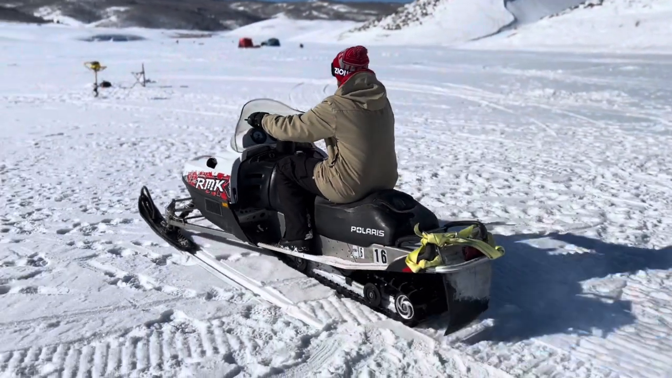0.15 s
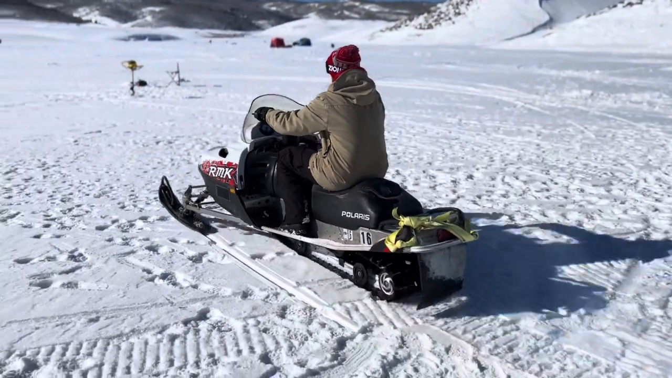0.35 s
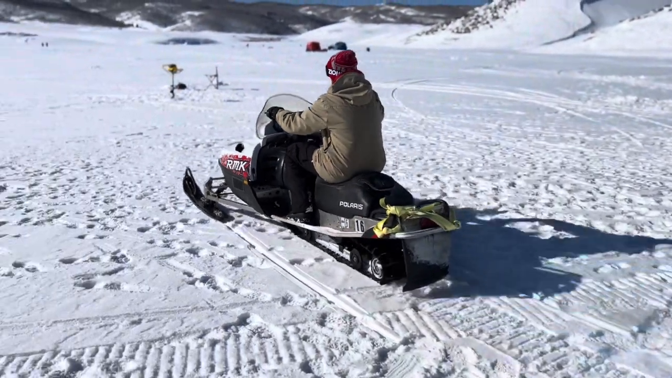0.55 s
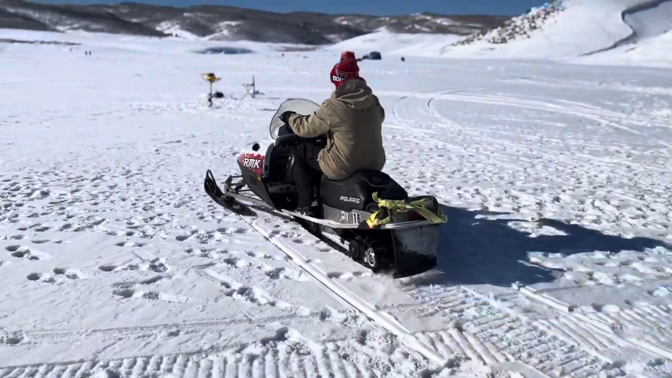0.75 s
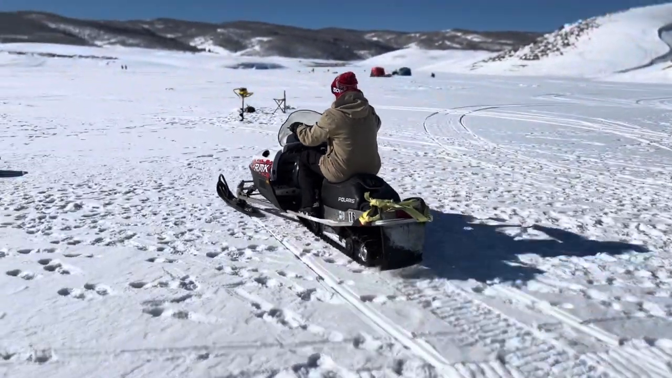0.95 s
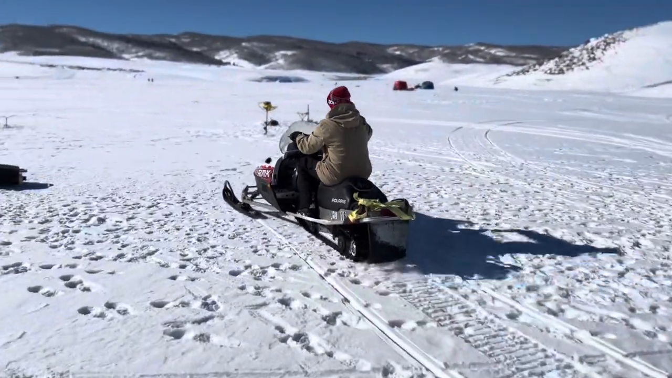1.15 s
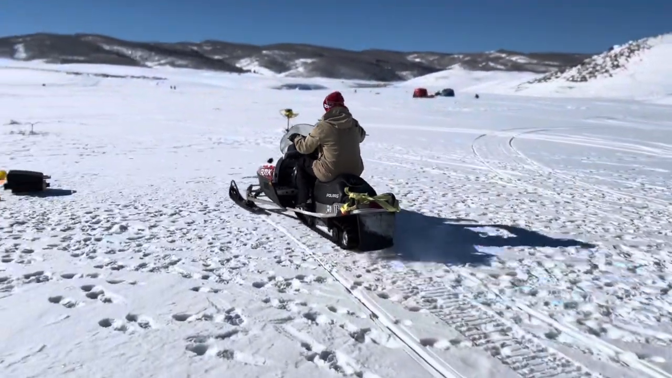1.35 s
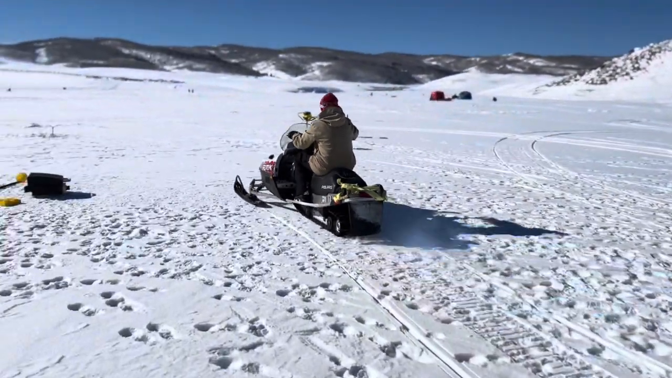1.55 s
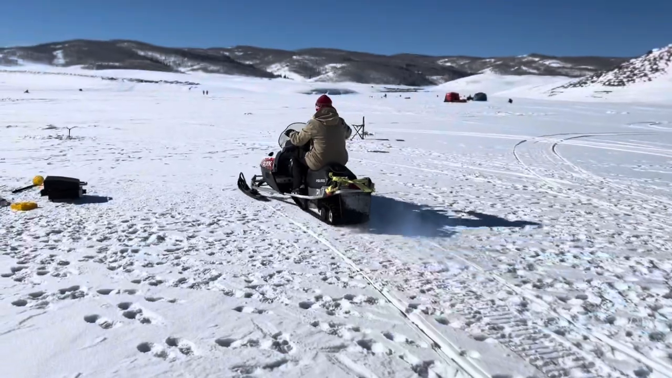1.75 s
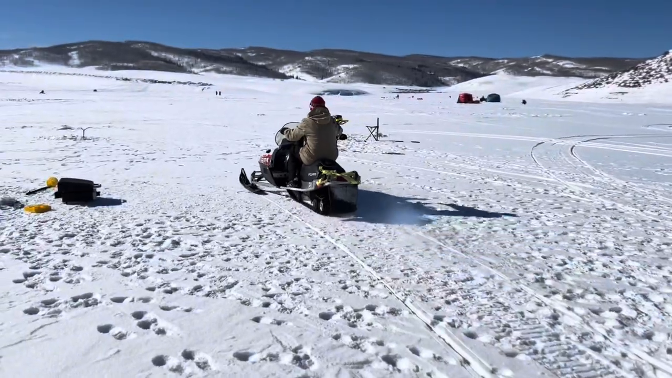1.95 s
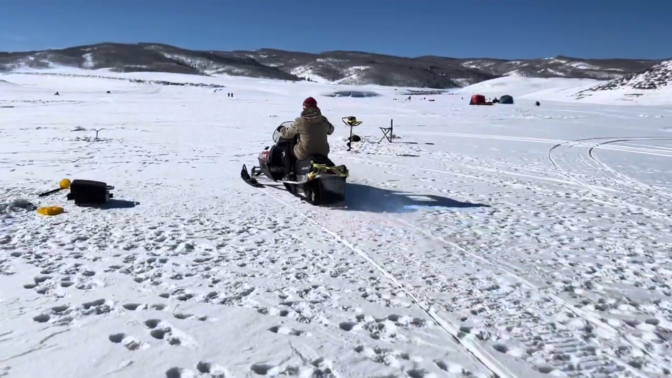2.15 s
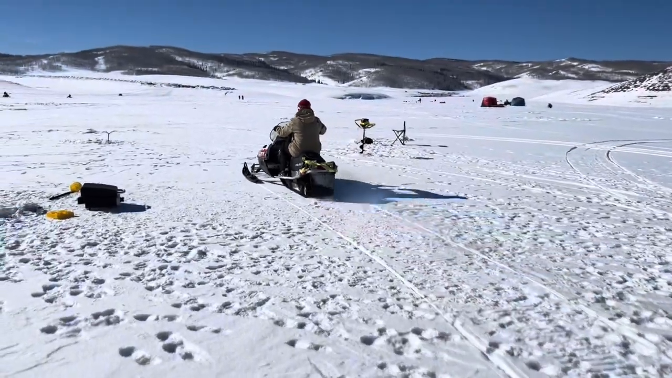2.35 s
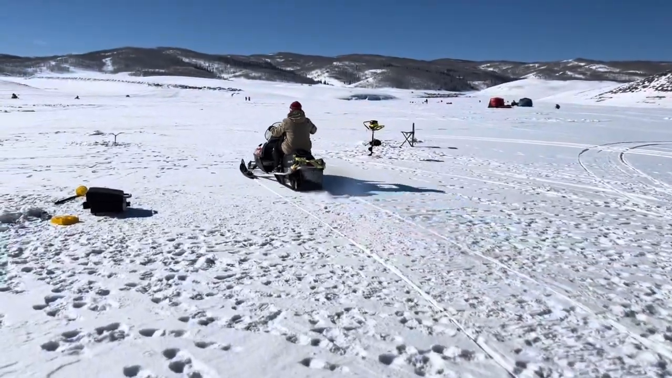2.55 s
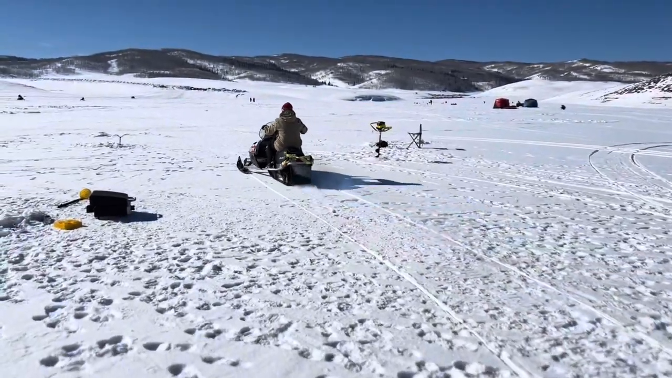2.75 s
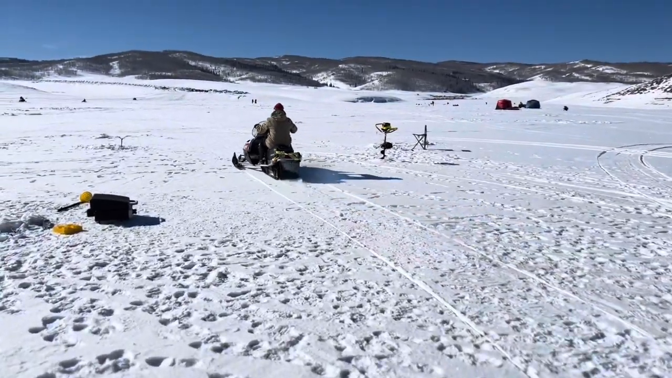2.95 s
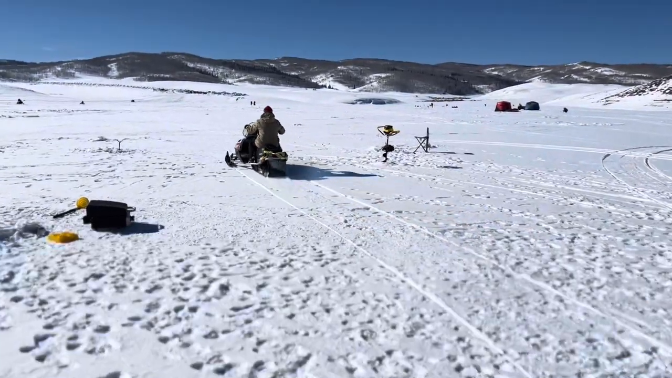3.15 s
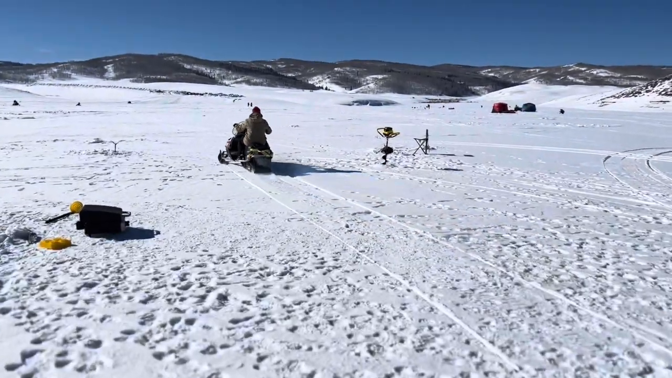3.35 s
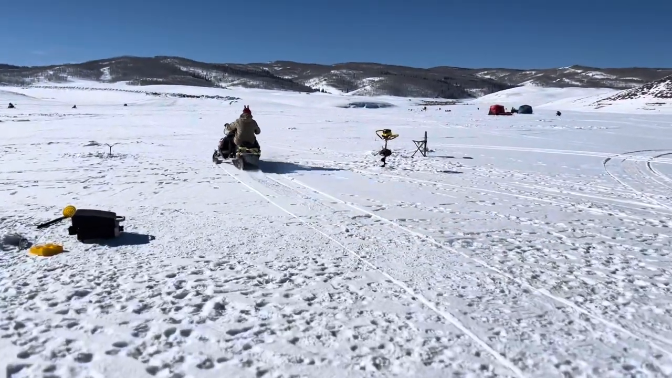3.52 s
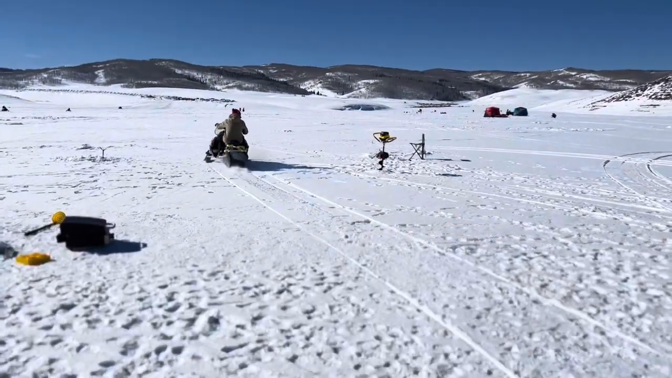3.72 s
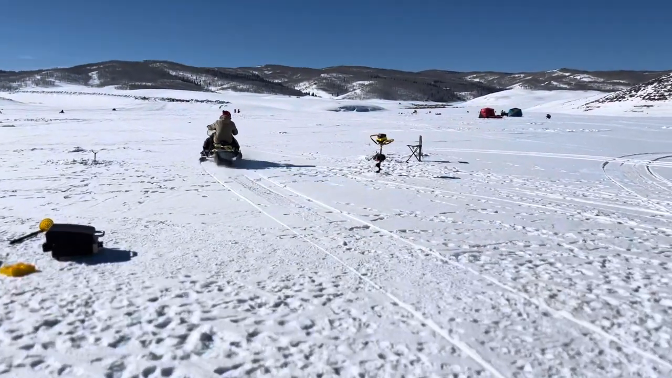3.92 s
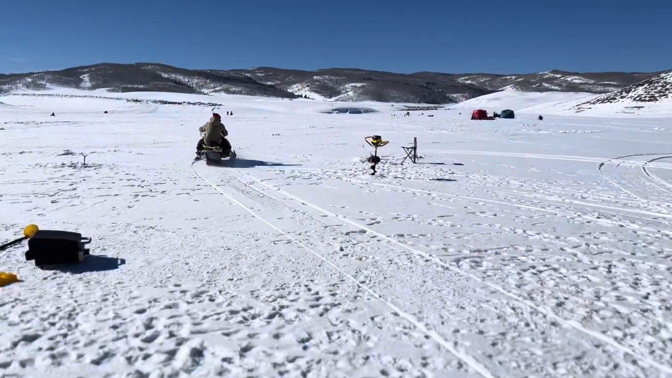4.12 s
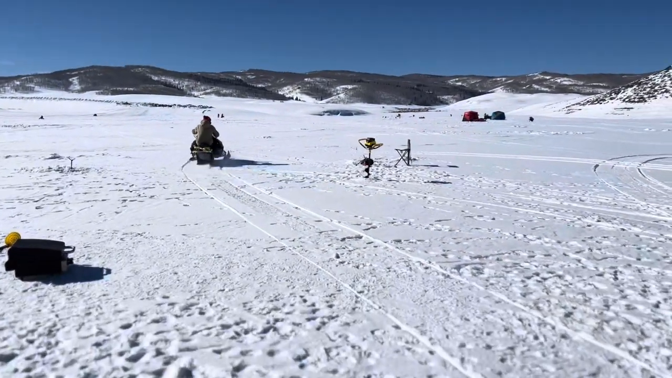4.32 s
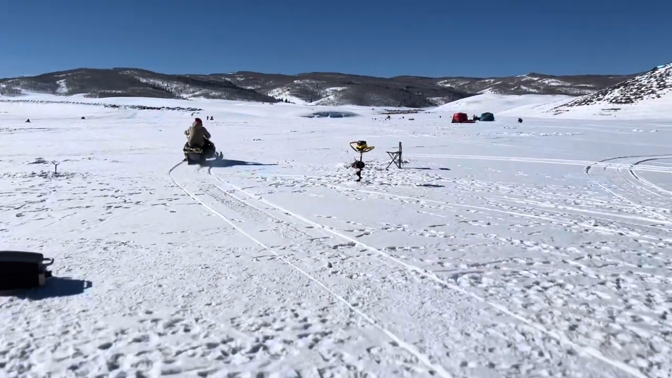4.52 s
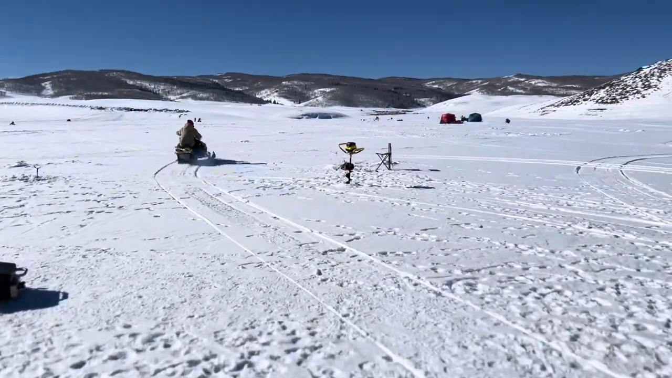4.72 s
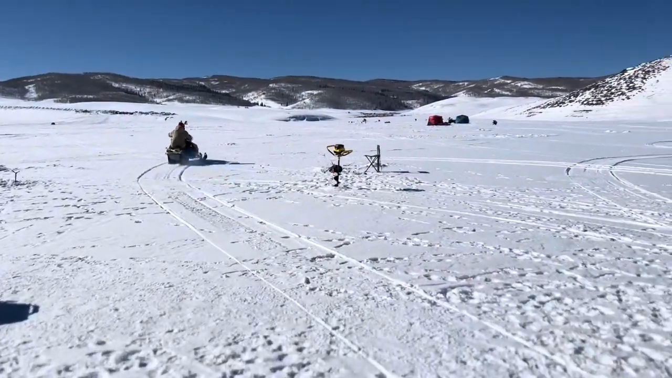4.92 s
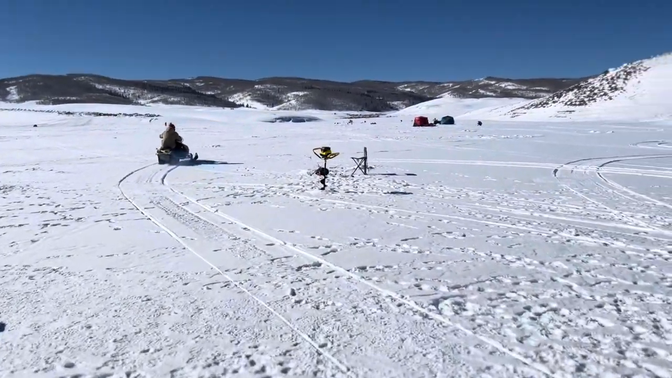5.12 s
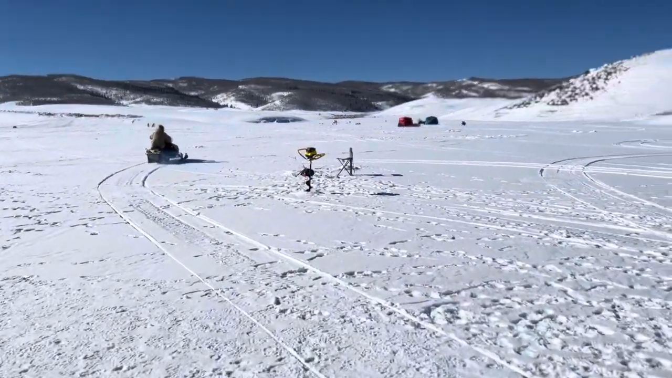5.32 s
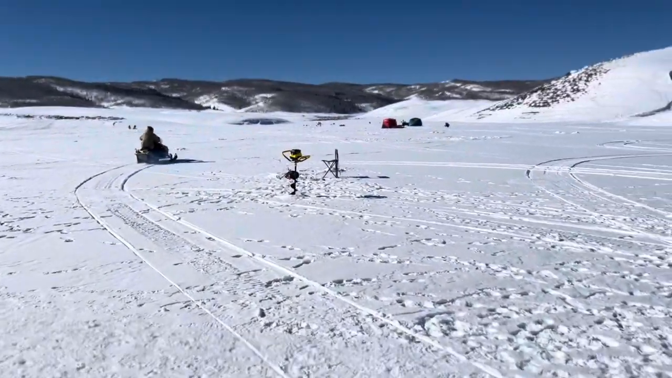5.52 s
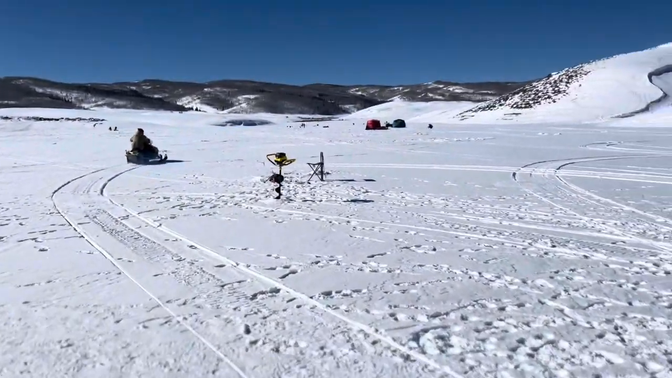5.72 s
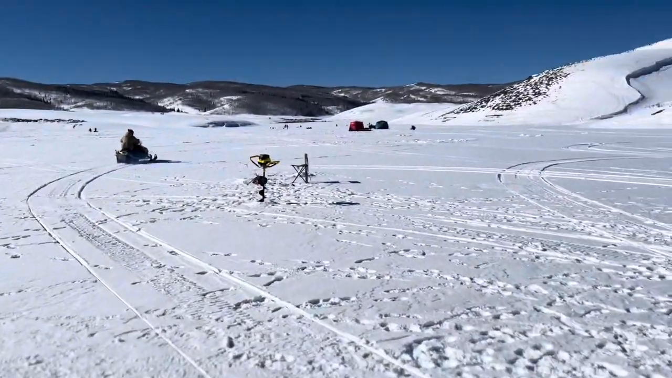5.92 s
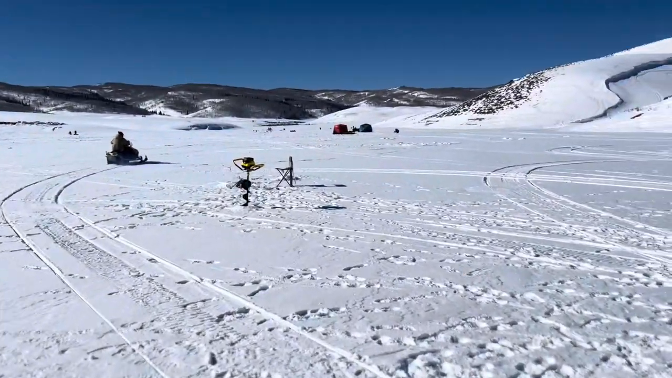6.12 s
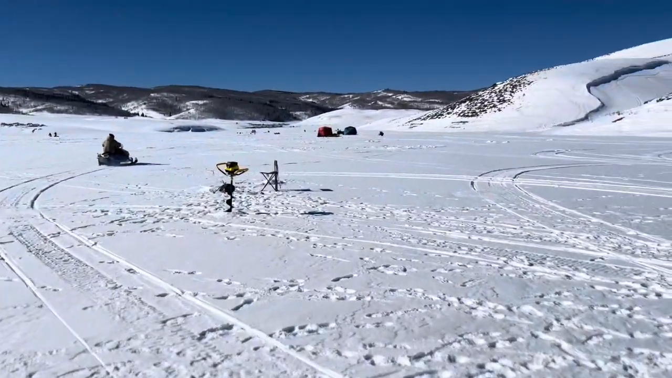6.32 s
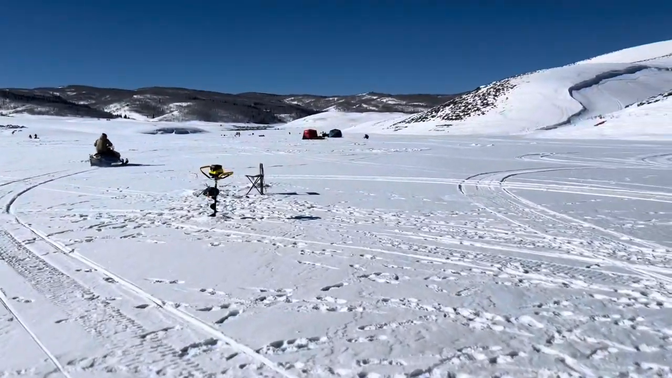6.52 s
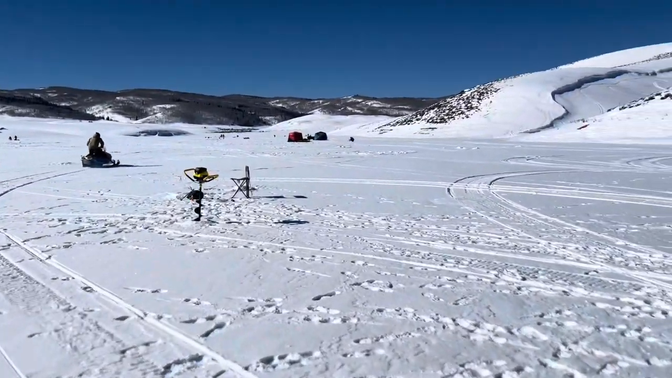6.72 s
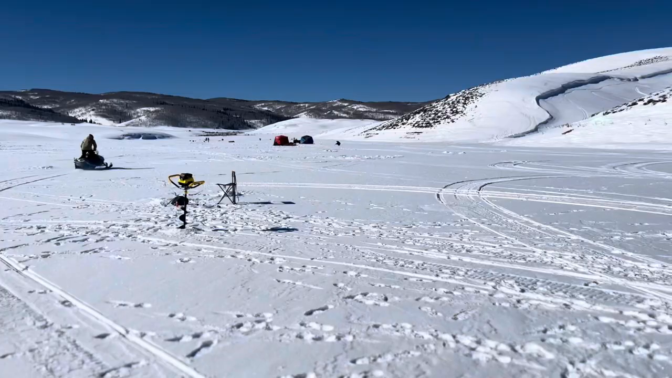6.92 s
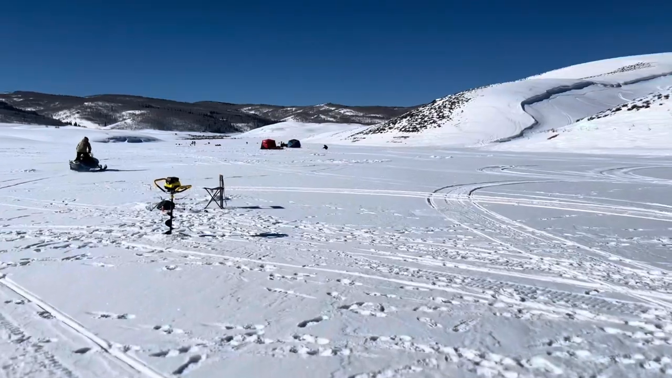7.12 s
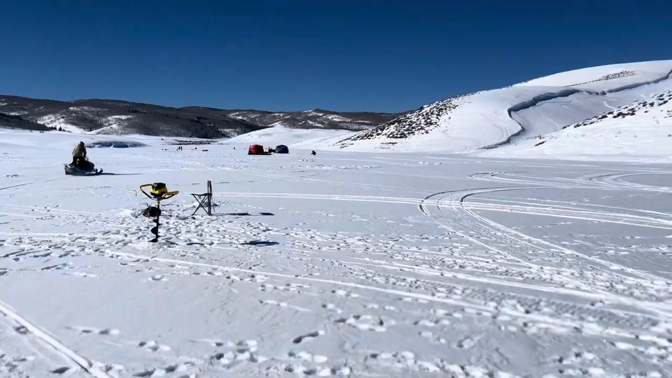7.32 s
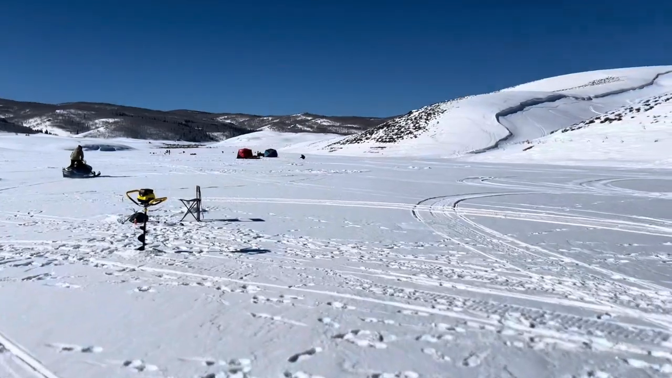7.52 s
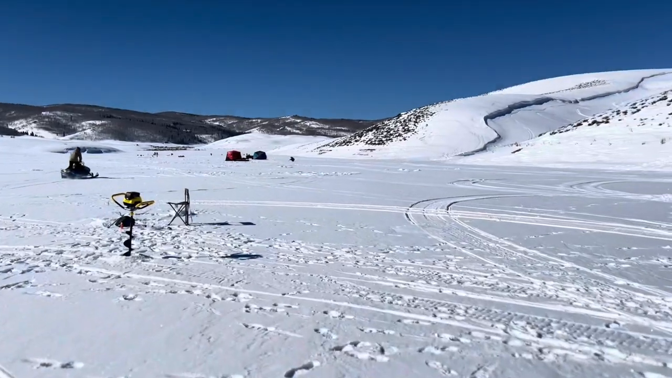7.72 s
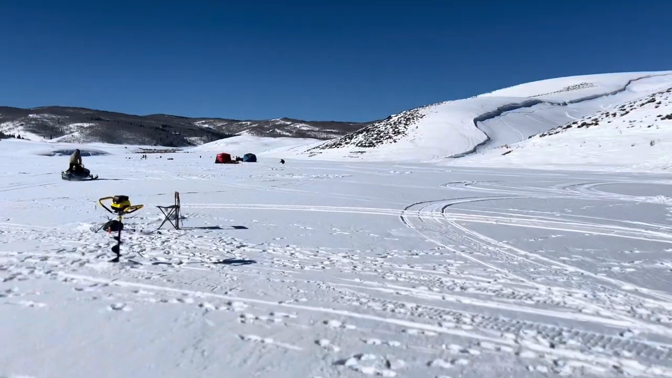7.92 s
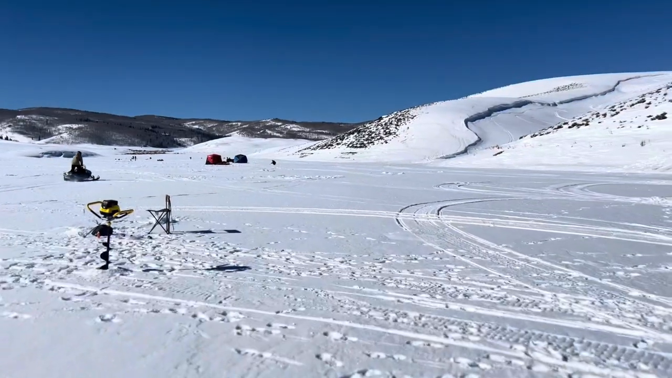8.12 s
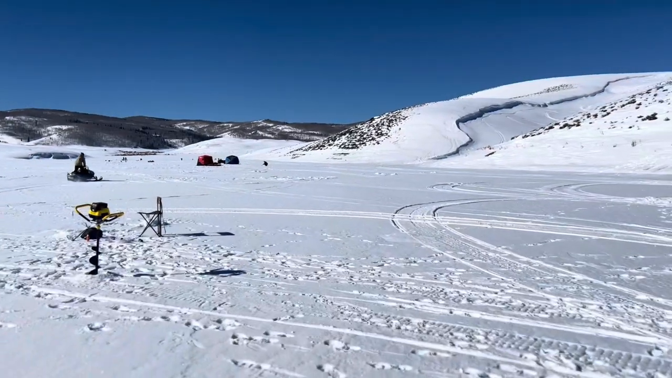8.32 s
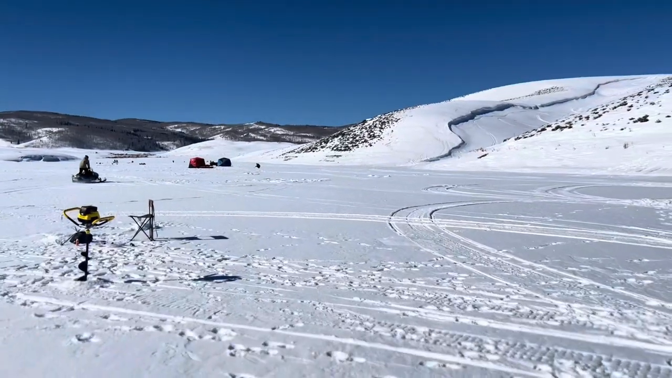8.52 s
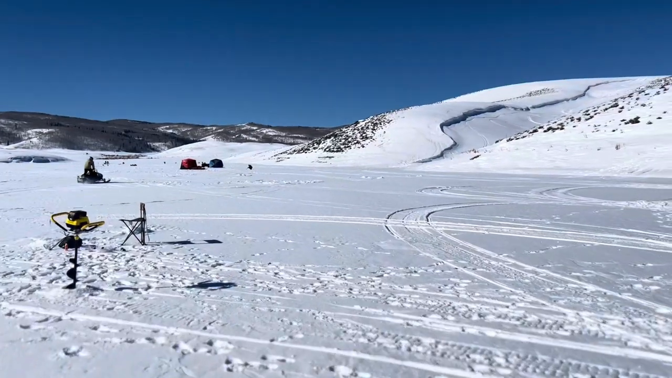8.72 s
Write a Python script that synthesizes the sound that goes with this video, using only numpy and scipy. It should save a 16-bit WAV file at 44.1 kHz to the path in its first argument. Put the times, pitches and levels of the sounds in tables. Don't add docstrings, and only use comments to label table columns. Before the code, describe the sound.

At 0 seconds a two-stroke snowmobile is already running loudly a few metres away, a low throbbing drone near 65 hertz with uneven thumping firings, raspy metallic buzz and bright snow hiss from track and skis. Over the first two seconds it pulls away, with irregular heavier pops, and the spray and rattle thin out. Small crisp crust snaps occur close to the microphone from about 1.4 seconds, strongest at 2.5 and clustered around 3.0 to 3.3. From 4 seconds packed snow creaks dully under boots, and soft wind thuds appear near 4.8, 5.6, 6.7 and 7.4. The engine becomes smaller and duller; around 5.8 the phone turns and the low sound leans further left. From 7 to 8.9 seconds the revs rise clearly to a higher, faint sputtering hum, with snow hiss briefly returning. Dry open air, no echo from the landscape.

```python
import sys
import numpy as np
from scipy import signal
from scipy.fft import rfft, irfft, next_fast_len
from scipy.io import wavfile
from scipy.ndimage import uniform_filter1d, map_coordinates

SR = 44100
rng = np.random.default_rng(int(sys.argv[2]) if len(sys.argv) > 2 else 0)


def master_out(mix):
    frames = np.transpose(np.atleast_2d(mix))
    ceiling = np.clip(frames, -1, 1)
    pcm = np.round(ceiling * 32767).astype(np.int16)
    wavfile.write(sys.argv[1], SR, pcm)


def volts_from_decibels(level):
    exponent = np.asarray(level, float) / 20
    return 10 ** exponent


N = 390726
T = np.arange(N) / SR
TURN_S = 5.82


def unit(x):
    return x / np.sqrt(np.mean(x ** 2) + 1e-20)


def along(points, hz):
    f, v = np.transpose(points)
    return np.interp(np.log(hz + 1), np.log(f + 1), v)


def curves(rows):
    s, *cols = np.transpose(rows)
    return [np.interp(T, s, c) for c in cols]


def step(x):
    return .5 + .5 * np.tanh(x / 2)


def wobble(rate_hz):
    coarse = T[::32]
    knots = rng.standard_normal(int(N * rate_hz / SR) + 4)
    return np.interp(T, coarse, map_coordinates(knots, [coarse * rate_hz]))


def filtered(x, response):
    m = next_fast_len(N + 8192)
    return irfft(rfft(x, m) * response(np.fft.rfftfreq(m, 1 / SR)), m)[..., :N]


def patchy(pair, depth_db):
    z = signal.stft(pair, nperseg=512)[2]
    field = uniform_filter1d(rng.standard_normal(z.shape[1:]), size=4, axis=0)
    field = uniform_filter1d(field, size=40, axis=1)
    return signal.istft(z * volts_from_decibels(depth_db * unit(field)), nperseg=512)[1][:, :N]


# [freq_hz, likeness_0_to_1]
PORT_LIKENESS = [(60, 1), (500, .95), (1200, .93), (2300, .85), (3200, .55), (8000, .6), (9100, 1),
                 (10900, 1), (11400, .95), (12200, .99)]


def rush(spectrum, patchy_db=None):
    noise = rng.standard_normal((2, N))
    if patchy_db:
        noise = patchy(noise, patchy_db)

    def split(hz):
        angle = np.arccos(np.clip(along(PORT_LIKENESS, hz), -1, 1)) / 2
        return volts_from_decibels(along(spectrum, hz)) * [np.cos(angle), np.sin(angle)]
    a, b = filtered(noise, split)
    return unit(np.array([a + b, a - b]))


START_M, SPEED_M_S, PICK_UP_S = 3, 4.4, 1.6


def distance():
    m = START_M + SPEED_M_S * (T - PICK_UP_S * (1 - np.exp(-T / PICK_UP_S)))
    return m, 20 * np.log10(m / START_M)


PIPE_PEAK_HZ, PEAK_WIDTH_HZ, PEAK_DB = 395, 15, 6
PIPE_EDGE_HZ, EDGE_WIDTH_HZ, EDGE_DB = 412, 6, -15
DIP_HZ, DIP_SINKS_HZ_PER_M, DIP_WIDTH = 500, 7.7, .17
DIP_FROM_M, DIP_DB_PER_M, DIP_MAX_DB = 13.5, 3, 19


def ground_db(hz, m):
    depth_db = np.clip(DIP_DB_PER_M * (m - DIP_FROM_M), 0, DIP_MAX_DB)
    dip_hz = DIP_HZ - DIP_SINKS_HZ_PER_M * m
    dip = np.exp(-(np.log(hz / dip_hz) / DIP_WIDTH) ** 2)
    peak = np.exp(-((hz - PIPE_PEAK_HZ) / PEAK_WIDTH_HZ) ** 2)
    return PEAK_DB * peak + EDGE_DB * step((hz - PIPE_EDGE_HZ) / EDGE_WIDTH_HZ) - depth_db * dip


def order_line(order, shaft_hz, turns):
    ease = .2 * (np.minimum(shaft_hz, 75) - 65) - .55
    lag = 1.35 * (order - 1) ** 2 + .9 * (order > 3) + 1.8 * (order == 5)
    return np.sqrt(2) * np.cos(2 * np.pi * order * turns + (order - 1) * ease - lag)


# [shaft_order, level_over_order_1_db, extra_loss_db_per_db_spreading]
PIPE_ORDERS = [(3, -10, 0), (4, -14, 0.42), (5, -12.5, 0.55), (6, -15, 5.06)]
SECOND_DB, SECOND_FADES = -3, 0.16


def exhaust_orders(shaft_hz, turns, beat_db, left):
    m, loss_db = distance()
    second_db = SECOND_DB - SECOND_FADES * loss_db + 1.03 * wobble(6.1)
    low = order_line(1, shaft_hz, turns) * left
    low = volts_from_decibels(beat_db) * (low + volts_from_decibels(second_db) * order_line(2, shaft_hz, turns))
    for k, db, fades in PIPE_ORDERS:
        level_db = beat_db + db - fades * loss_db + ground_db(k * shaft_hz, m)
        level_db = level_db + wobble(3) + min(k - 2.7, 1.2) * wobble(18)
        low += volts_from_decibels(level_db) * order_line(k, shaft_hz, turns) * (.5 + left / 2)
    return low


# [shaft_order, level_over_casing_db, start_s, end_s]
CASING_BEAMS = [(7, -3.5, -1, .5), (8, -7, -1, .6), (8, -10, 1.1, 3.5), (9, -6, -2.5, .9),
                (10, -9, 1.55, 2.8), (11, -11, -1, 1.2), (11, -6.5, 1.2, 7.2), (12, -7, 1.5, 2.4),
                (13, -9, -1, .45), (13, -1, .45, 1.1), (13, -9, 1.1, 2.3), (14, -8, -1, 2.4),
                (15, -10, .5, 2.4), (15, -11, 3, 5.7), (16, -3, -1, 1.1), (16, -7.5, 1.9, 5.2),
                (17, -9, .9, 1.6), (19, -8, -1, .65), (22, -9, 1.5, 2.4), (26, -7, .75, 1.3),
                (24, -8, 1.1, 1.8), (24, -2, 1.8, 2.6), (22, -7, 3, 3.9), (9, -9, 6.8, 7.35),
                (14, -6, 7.3, 7.7), (13, -9, 7.75, 8.1), (8, -9, 7.9, 8.4), (11, -10, 8, 9.5),
                (10, -9, 8.1, 9.5)]
REST_DB, REST_FADES, SWING_S = -15, .2, .15


def casing_orders(shaft_hz, turns, casing_db):
    loss_db = distance()[1]
    blur_db = -.12 * np.maximum(T - 3, 0)
    high = np.zeros(N)
    for k in range(7, 27):
        aim_db = REST_DB - REST_FADES * loss_db + max(k - 11, 0) * blur_db - .5 * max(k - 16, 0)
        for order, db, start_s, end_s in CASING_BEAMS:
            if round(order) == k:
                facing = step((T - start_s) / SWING_S) * step((end_s - T) / SWING_S)
                aim_db = aim_db + (db - aim_db) * facing
        level_db = casing_db + aim_db + 1.6 * wobble(9) + 1.5 * wobble(30)
        high += volts_from_decibels(level_db) * order_line(k, shaft_hz, turns)
    return high


# [freq_hz, density_db_per_hz]
CASING_SPECTRUM = [(250, -120), (350, 3), (600, -4), (850, -2), (1120, 2), (1330, -6), (1700, -12),
                   (2200, -120)]


def casing_rasp(puff, casing_db):
    return volts_from_decibels(casing_db - .8 + wobble(11)) * puff ** 1.28 * rush(CASING_SPECTRUM)


# [freq_hz, density_db_per_hz]
RUMBLE_SPECTRUM = [(40, -120), (50, -10), (60, -1), (110, -1), (190, -4), (280, -14), (500, -24),
                   (700, -120)]
# [freq_hz, density_db_per_hz]
DRONE_SPECTRUM = [(180, -120), (270, -2), (450, 1), (560, -120)]
DRONE_DB, DRONE_HZ = -20.5, 336


def exhaust_rumble(beat_db):
    rumble = volts_from_decibels(beat_db - 13 + wobble(3.8)) * rush(RUMBLE_SPECTRUM)
    drone_db = beat_db + DRONE_DB + 1.5 * ground_db(DRONE_HZ, distance()[0])
    return rumble + volts_from_decibels(drone_db) * rush(DRONE_SPECTRUM)


# [time_s, lug_hz, level_db]
LUG_PASSING = [(0, 15, -46), (2, 18.8, -41), (3, 21.6, -38), (4, 23.4, -39), (5.8, 25.7, -42), (7, 28, -45),
               (8.1, 33.7, -46), (8.86, 38.3, -47)]


def track():
    lug_hz, db = curves(LUG_PASSING)
    turns = np.cumsum(lug_hz * (1 + .012 * wobble(10))) / SR
    later = step((T - 5.6) / 0.49)

    def line(order):
        return np.sin(2 * np.pi * order * turns)
    hum = later * line(4) + (1 - 1.03 * later) * (line(5) + 0.48 * line(7.5))
    return volts_from_decibels(db + 5.0 + 2.4 * wobble(3.6)) * hum


# [near_hz, far_hz, width_hz, level_db]
COWL_MODES = [(2450, 2330, 70, 0), (2620, 2510, 70, 0), (3000, 3030, 80, -3), (3700, 3830, 90, -3),
              (4250, 4290, 90, 2)]
PANEL_TURN_S = 1.7


def panels(shake):
    def ring(side):
        def response(f):
            total = 0
            for row in COWL_MODES:
                damping = 1j * f * row[2]
                total = total + volts_from_decibels(row[3]) * damping / (row[side] ** 2 - f * f + damping)
            return total
        return unit(filtered(shake, response))
    far = step((T - PANEL_TURN_S) / .2)
    return np.sqrt(1 - far) * ring(0) + np.sqrt(far) * ring(1)


# [freq_hz, density_db_per_hz]
HISS_SPECTRUM = [(950, -120), (1250, -3), (1650, 0), (2000, 0), (2400, -2.5), (2850, -1), (3500, -2),
                 (4500, -120)]
# [freq_hz, density_db_per_hz]
SPRAY_SPECTRUM = [(2800, -120), (3500, -.5), (5500, -5), (9000, -8.5), (10000, -12), (11250, -14),
                  (15400, -19), (16200, -120)]
HISS_DB, PANEL_DB = .7, -7
SPRAY_DB, SPRAY_GROWS = -6.5, 1.04


def snow(puff, throw_db):
    gust = wobble(9)
    mean_db = throw_db.mean()
    spray_db = mean_db + SPRAY_DB + SPRAY_GROWS * (throw_db - mean_db)
    noise = rush(HISS_SPECTRUM)
    hiss = puff ** .35 * noise + volts_from_decibels(PANEL_DB) * panels(puff ** 2 * noise[:, ::-1])
    hiss = volts_from_decibels(throw_db + HISS_DB + .6 * gust + 0.93 * wobble(30)) * hiss
    spray = puff ** 0.4 * rush(SPRAY_SPECTRUM, patchy_db=2)
    return hiss + volts_from_decibels(spray_db + 0.4 * gust + 1.08 * wobble(25)) * spray


# [start_s, count, gap_s]
HEAVY_FIRINGS = [(.516, 2, .076), (.712, 1, 0), (.877, 5, .1125), (1.505, 3, .116), (1.909, 1, 0),
                 (2.222, 2, .128), (2.591, 3, .098), (3.049, 1, 0), (3.421, 2, .165), (3.724, 1, 0),
                 (4.025, 2, .273), (4.518, 2, .095), (4.775, 1, 0), (4.923, 9, .117), (6.06, 3, .093),
                 (6.295, 1, 0), (6.471, 2, .133), (6.824, 1, 0), (7.171, 2, .164), (8.771, 1, 0)]
# [freq_hz, level_db, t60_s]
PIPE_MODES = [(60, 0, .22), (170, -2, .05), (770, -14, .04)]
POP_DB = -6.5
KNOCK, KNOCK_HZ = 0.57, 740


def thumps(turns, beat_db, scatter_db):
    surplus, heavy = np.zeros((2, N))
    fires = np.flatnonzero(np.diff(np.floor(2 * (turns - .27))))
    surplus[fires] = volts_from_decibels(beat_db[fires] + scatter_db[fires]) * rng.standard_normal(len(fires))
    for start_s, count, gap_s in HEAVY_FIRINGS:
        for k in range(count):
            at = fires[::2][np.argmin(abs(T[fires[::2]] - (start_s + gap_s * k)))]
            heavy[at] = volts_from_decibels(beat_db[at] + POP_DB + rng.normal(0, 1))
    t = np.arange(SR // 4) / SR
    ring = np.zeros(len(t))
    for hz, db, t60_s in PIPE_MODES:
        ring += volts_from_decibels(db - 60 * t / t60_s) * (1 - np.exp(-t / .004)) * np.sin(2 * np.pi * hz * t)
    u = t - .015
    bark = -2.4 * np.exp(-(u / .006) ** 2) * np.cos(2 * np.pi * 170 * u)
    knock = np.sin(2 * np.pi * KNOCK_HZ * u) + .7 * np.sin(2.6 * np.pi * KNOCK_HZ * u)
    knock = KNOCK * step(u / .0006) * volts_from_decibels(-60 * u / .06) * knock
    lull = np.maximum(u - .004, 0) / .011
    lull = 1.6 * lull * np.exp(1 - lull)

    def after(shape):
        return signal.fftconvolve(heavy, shape)[round(.015 * SR):][:N]
    left = 1 - np.minimum(after(lull) / volts_from_decibels(beat_db), 1.2)
    return signal.fftconvolve(surplus, ring)[:N] + after(bark + knock), left


# [time_s, shaft_hz]
SHAFT_SPEED = [(0, 65.1), (.3, 64.4), (.5, 65.1), (.72, 66.9), (1.23, 66.7), (1.95, 70.5), (2.29, 70.1),
               (2.9, 72.6), (3.75, 72.7), (4.47, 73.3), (4.91, 74.6), (5.82, 74.8), (6.46, 75.6),
               (7.25, 79.3), (7.7, 81.5), (8.23, 87.4), (8.86, 88.8)]
# [time_s, exhaust_db, thrown_snow_db]
EFFORT_LEVELS = [(0, -16, -30.5), (.5, -16.5, -32.5), (1.1, -17.5, -34), (1.9, -21.5, -35),
                 (2.5, -21.5, -37), (3.3, -24.5, -41), (3.8, -25, -42), (4.3, -28, -44.5), (4.7, -27, -46),
                 (5.5, -29, -43.5), (5.8, -30.5, -43.5), (6.05, -33.5, -44.5), (6.65, -33.5, -46),
                 (7.45, -33.5, -41), (8.3, -35.5, -41.5), (8.86, -38, -43.5)]
CASING_DB, CASING_FADES = -29, 0.72
LOAD_HZ, LOAD_DB_PER_HZ = 78, 0.16
SHADOW_M, SHADOW_WIDTH_M, SHADOW_DB = 12.3, 1.5, -7.5
SCATTER_DB, SCATTER_GROWS = -20.5, 0.8
PAN_DB, TURNED_DB, TURNING_S = .8, 6, .07


def machine():
    shaft_hz = curves(SHAFT_SPEED)[0]
    beat_db, throw_db = curves(EFFORT_LEVELS)
    m, loss_db = distance()
    casing_db = CASING_DB - CASING_FADES * loss_db
    casing_db += LOAD_DB_PER_HZ * np.maximum(shaft_hz - LOAD_HZ, 0)
    casing_db += SHADOW_DB * step((m - SHADOW_M) / SHADOW_WIDTH_M)
    turns = np.cumsum(shaft_hz * (1 + .001 * wobble(8))) / SR
    puff = 1 + .15 * np.cos(2 * np.pi * turns) + .5 * np.cos(4 * np.pi * turns)
    uneven, left = thumps(turns, beat_db, SCATTER_DB + SCATTER_GROWS * loss_db)
    bass = exhaust_orders(shaft_hz, turns, beat_db, left) + uneven + track() + exhaust_rumble(beat_db)
    lean_db = (PAN_DB + (TURNED_DB - PAN_DB) * step((T - TURN_S) / TURNING_S)) / 2
    casing = casing_orders(shaft_hz, turns, casing_db) + casing_rasp(puff, casing_db)
    return bass * volts_from_decibels([lean_db, -lean_db]) + casing + snow(puff, throw_db)


# [freq_hz, left_db, right_db, extra_right_lag_rad]
PORTS_AHEAD = [(300, 0, 0, 0), (450, 0, 0, .3), (620, 2, -1.5, .1), (800, 4.5, -5.5, -.4),
               (1120, -.5, -4.5, -.3), (1300, 0, -1.3, -.1), (1470, -2, -2, .4), (1650, 0, -4.5, .9),
               (1810, .7, -7.5, 1.9), (1990, -.7, -6, 2.9), (2330, 4.6, -1.5, 5.2), (2670, 8.2, -5.3, 5.5),
               (2850, 3.5, -5.2, 2 * np.pi), (3050, 1.2, -4.7, 2 * np.pi), (3400, 1.6, -10.7, 2 * np.pi),
               (3850, 7, -6, 2 * np.pi), (4300, 5, -3.3, 2 * np.pi), (5700, 8.5, -1, 2 * np.pi),
               (6400, 3.8, -3, 2 * np.pi), (8500, -1.2, -2.3, 2 * np.pi), (9500, 0, 0, 2 * np.pi)]
# [freq_hz, left_db, right_db, extra_right_lag_rad]
PORTS_AWAY = [(300, 0.0, 0.0, 0.2), (450, 0.6, -0.4, 0.4), (620, 4.0, -3.5, 0.4), (800, 4.3, -3.4, -0.2),
              (1120, 2.2, -0.5, 0.5), (1300, 1.7, 2.4, 0.6), (1470, 2.9, 4.0, 0.5), (1650, 2.1, 0.1, 1.0),
              (1810, 0.5, -2.5, -0.4), (1990, 0.1, 1.8, -1.8), (2330, 5.0, 4.3, -0.6),
              (2670, 0.5, -2.0, 0.5), (2850, 0.9, -4.4, 0), (3050, 2.2, -6.7, 0), (3400, -0.2, -9.1, 0),
              (3850, 4.7, -3.5, 0), (4300, 4.2, -1.3, 0), (4750, 4.6, -2.0, 0), (5200, 5.9, -3.5, 0),
              (5700, 4.6, -4.3, 0), (6400, 1.8, -3.6, 0), (7200, -1.7, -2.4, 0), (8500, -1.6, -2.8, 0),
              (9500, -0.0, -0.0, 0)]
# [freq_hz, left_db, right_db, extra_right_lag_rad]
PORTS_TURNED = [(300, -0.0, -0.0, -0.2), (450, -0.0, 0.3, 0.0), (620, 4.7, -0.2, 1.0),
                (800, 6.2, -1.7, 0.8), (1120, 5.1, 1.1, 1.1), (1300, 2.5, 3.0, 1.1), (1470, 1.2, 1.4, 1.1),
                (1650, -0.4, -3.1, 1.0), (1810, -1.0, -6.3, 0.0), (1990, -0.9, 0.3, -1.0),
                (2330, 0.9, 1.3, -0.3), (2670, 1.2, -4.6, 0.0), (2850, 0.9, -7.9, 0), (3050, 0.8, -7.5, 0),
                (3400, -1.7, -8.2, 0), (3850, 4.0, -2.3, 0), (4300, 4.8, 0.3, 0), (4750, 8.2, 2.1, 0),
                (5200, 8.0, 1.2, 0), (5700, 8.7, 1.4, 0), (6400, 2.6, 2.0, 0), (7200, -3.0, -1.9, 0),
                (8500, -3.9, -3.2, 0), (9500, -0.0, -0.0, 0)]
# [freq_hz, lead_rad]
LEFT_LEAD = [(20, 0), (200, .12), (450, .3), (700, 1.2), (1000, 1), (1250, 1.8), (1450, 3.1), (2000, 5),
             (2600, 7.3), (6000, 16), (7300, 7 * np.pi), (8400, 8 * np.pi), (9300, 9 * np.pi),
             (10900, 9 * np.pi), (11500, 10 * np.pi)]
# [time_s, left_delay_ms, right_delay_ms, strength]
BODY_ECHO = [(0, 1.17, 1.34, .75), (1.15, 1.17, 1.35, .75), (1.6, 1.25, 1.34, .7), (3.2, 1.25, 1.3, .55),
             (5.7, 1.27, 1.31, .4), (5.95, 1.06, 1.42, .7), (8.86, 1.06, 1.42, .8)]
ECHO = 0.4


def ports(pair):
    def shade(rows, hz):
        f, *cols = np.transpose(rows)
        left_db, right_db, lag = (np.interp(hz, f, c) for c in cols)
        half = along(LEFT_LEAD, hz) / 2
        return np.array([volts_from_decibels(left_db) * np.exp(1j * half), volts_from_decibels(right_db) * np.exp(-1j * (half + lag))])

    def treble_band(hz):
        return np.clip((hz - 3200) / 800, 0, 1) * np.clip((8500 - hz) / 2500, 0, 1)
    near, far, turned = (filtered(pair, lambda hz: shade(rows, hz))
                         for rows in (PORTS_AHEAD, PORTS_AWAY, PORTS_TURNED))
    away = np.clip((T - 1.2) / 1.0, 0, 1)
    turn = step((T - TURN_S) / .2)
    direct = (1 - away) * near + away * ((1 - turn) * far + turn * turned)
    treble = filtered(direct, treble_band)
    sway_ms = .018 * wobble(4)
    *delays_ms, share = curves(BODY_ECHO)
    echo = [np.interp(T - (ms + sway_ms) / 1000, T, side) for ms, side in zip(delays_ms, treble)]
    return direct + ECHO * share * np.array(echo)


# [time_s, level_db]
WIND_PUFFS = [(4.75, -39), (5.15, -46), (5.6, -41), (6.65, -34), (7.4, -37), (8.6, -47)]


def wind():
    swell = sum(volts_from_decibels(db) * np.exp(-((T - s) / 0.1) ** 2) for s, db in WIND_PUFFS)
    air = filtered(rng.standard_normal((2, N)), lambda hz: np.exp(-np.log((hz + 1) / 60) ** 2 / 1.3))
    return (swell + volts_from_decibels(-58)) * unit(air) * volts_from_decibels([[2.5], [-2.5]])


# [time_s, ring_db, ring_hz, snap_over_ring_db, fall_20db_s]
CRUST_CRACKS = [(1.3942, -24, 12000, -1, .002), (1.5338, -29, 13000, -2, .002),
                (1.7555, -25, 12500, -3, .004), (2.415, -28, 8000, 4, .003), (2.513, -17, 8200, -1, .003),
                (2.5132, -2, 1900, -34, .004), (2.9833, -11, 6300, -14, .003),
                (3.002, -27, 2000, -20, .004), (3.0315, -21, 5000, -10, .003),
                (3.0355, -11, 6300, -10, .003), (3.039, -14, 4900, -13, .004),
                (3.062, -24, 6000, -12, .003), (3.1155, -32, 5000, -3, .002),
                (3.2685, -12, 6300, -19, .002), (3.9744, -42, 3000, -3, .003), (4.577, -38, 3400, -3, .003),
                (4.702, -42, 6000, -3, .006), (6.258, -34, 5500, -14, .002), (6.925, -38, 5700, -10, .004),
                (7.275, -36, 5500, -14, .004)]
# [freq_hz, density_db_per_hz]
SNAP_SPECTRUM = [(700, -120), (1100, 9), (1900, 17), (3000, 11), (8600, 5), (10000, -10), (11200, -1),
                 (16300, -9)]


def cracks():
    out, t = np.zeros((2, N + SR)), np.arange(2048) / SR - .005
    hz = np.fft.rfftfreq(len(t), 1 / SR)
    half = volts_from_decibels(3 * np.exp(-np.log((hz + 1) / 5600) ** 2 / .2))
    half = half * np.exp(.5j * along(LEFT_LEAD, np.minimum(hz, 6000)) * (hz < 11000))
    for s, db, ring_hz, snap_db, fall_s in CRUST_CRACKS:
        envelope = volts_from_decibels(db - 20 * abs(t) / max(fall_s, .001)) * step(t / .0002)
        a, b = envelope * rng.standard_normal((2, len(t)))
        ring = 2.2 * np.exp(-(np.log((hz + 1) / ring_hz) / .13) ** 2)
        colour = ring + volts_from_decibels(snap_db + along(SNAP_SPECTRUM, hz))
        crack = irfft(rfft([a + b / 2, a - b / 2]) * colour * [half, 1 / half])
        out[:, round((s + t[0]) * SR):][:, :len(t)] += crack
    return out[:, :N]


# [time_s, peak_db, pitch_hz, pan_db]
BOOT_CREAKS = [(4.0, -28, 680, -15), (4.18, -26.5, 730, -8), (4.359, -41, 735, -4), (4.572, -45, 740, 0),
               (5.09, -34.5, 422, -5), (5.491, -53, 452.2, 8), (6.188, -35, 345, -11), (7.34, -30, 340, 3),
               (7.897, -41, 700, 6), (8.49, -34, 408, 0)]


def boots():
    out, t = np.zeros((2, N + SR)), np.arange(SR // 10) / SR
    for s, db, hz, pan_db in BOOT_CREAKS:
        spread = np.linspace(-.3, .4, 24)[:, None] + .02 * rng.standard_normal((24, 1))
        tones = np.sin(2 * np.pi * hz * np.exp(spread) * (t + 1)).sum(0)
        creak = volts_from_decibels(db - 14.5 - 60 * t / .14) * (1 - np.exp(-t / .006)) * tones
        out[:, round(s * SR):][:, :len(t)] += volts_from_decibels([[pan_db / 2], [-pan_db / 2]]) * creak
    return out[:, :N]


def scene():
    return ports(machine() + boots()) + cracks() + wind()


def low_pass(x):
    return signal.sosfilt(signal.butter(12, 16510, fs=SR, output="sos"), x)


def record(dry):
    def low_cut(hz):
        return 1 / np.sqrt(1 + (50 / (hz + 1)) ** 10)
    return low_pass(filtered(dry, low_cut))


dry = scene()
out = record(dry)
master_out(out)
```